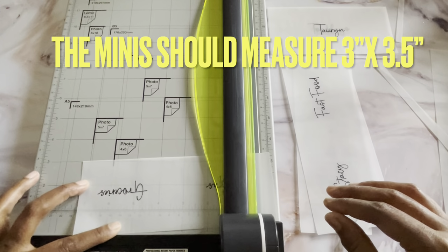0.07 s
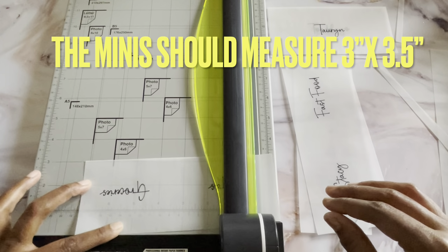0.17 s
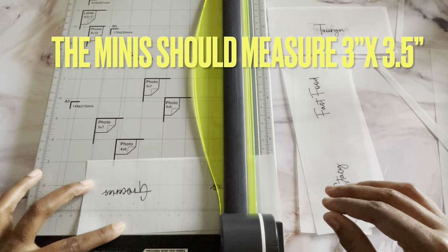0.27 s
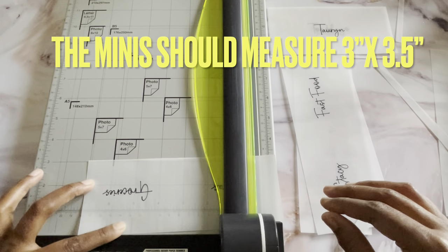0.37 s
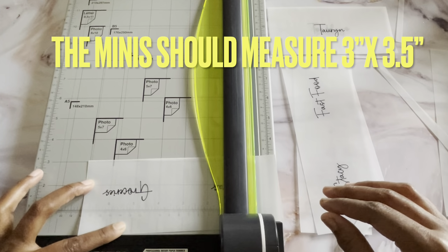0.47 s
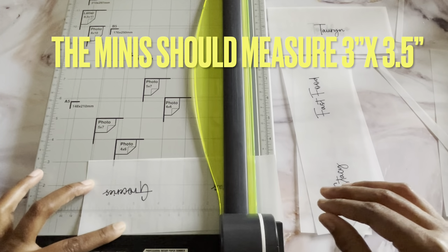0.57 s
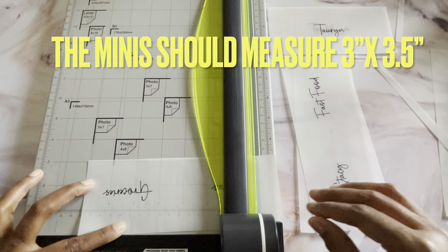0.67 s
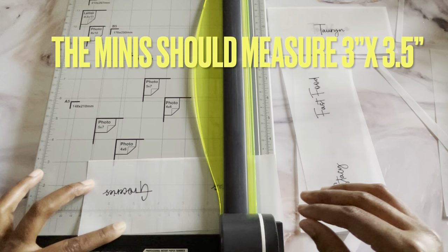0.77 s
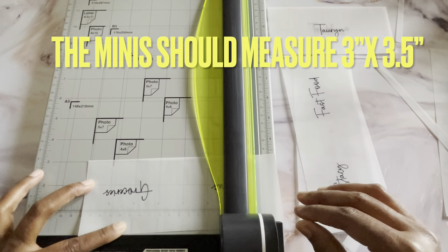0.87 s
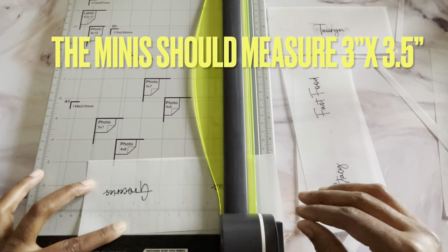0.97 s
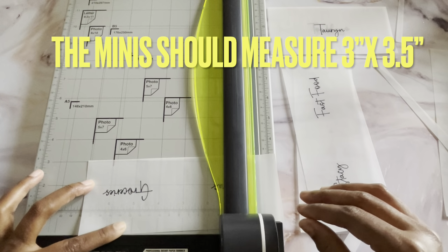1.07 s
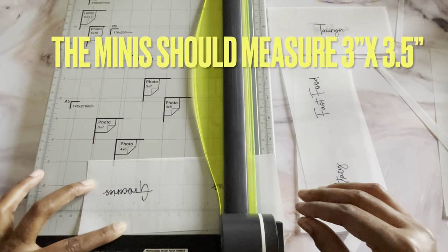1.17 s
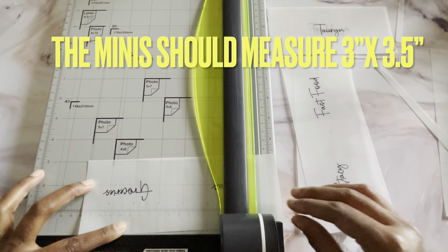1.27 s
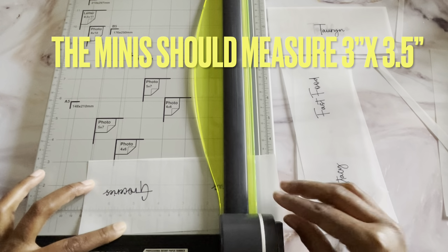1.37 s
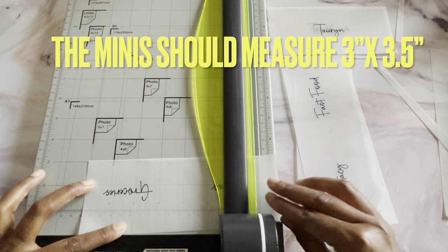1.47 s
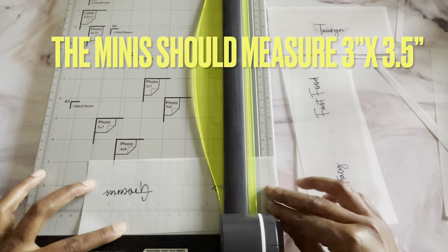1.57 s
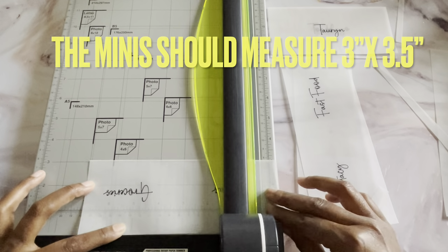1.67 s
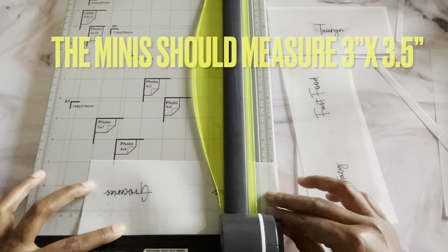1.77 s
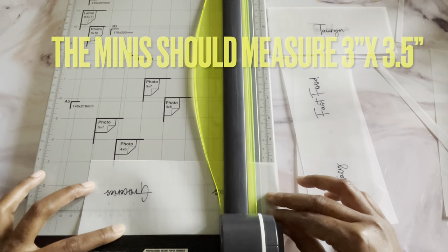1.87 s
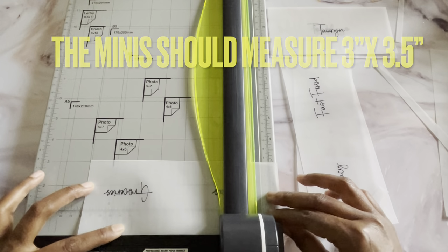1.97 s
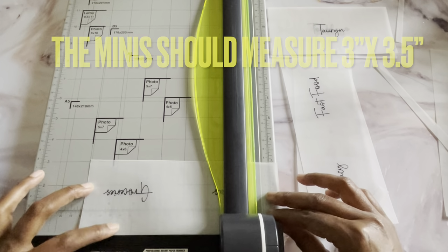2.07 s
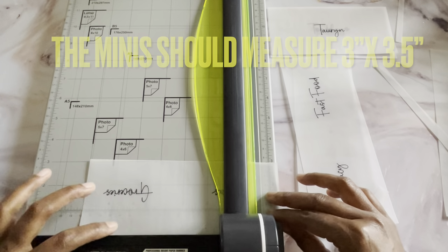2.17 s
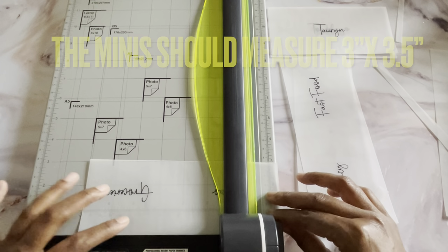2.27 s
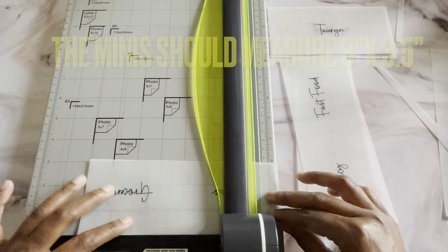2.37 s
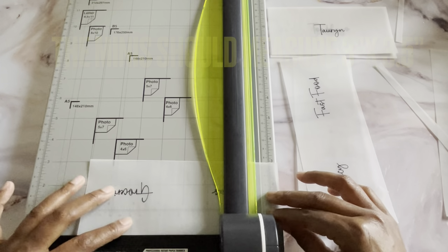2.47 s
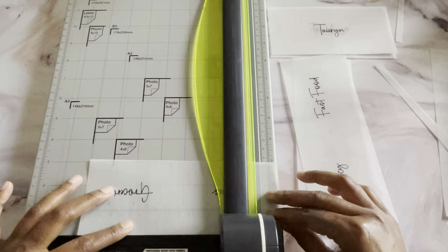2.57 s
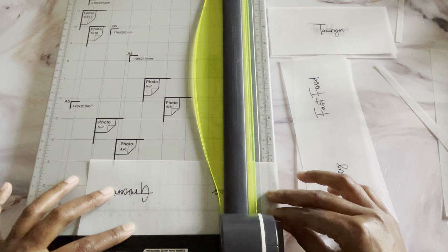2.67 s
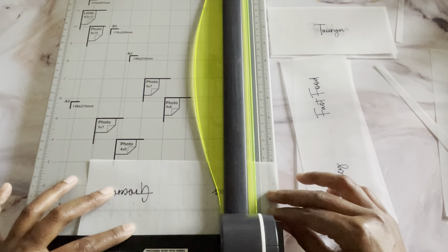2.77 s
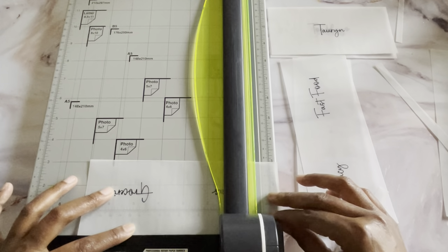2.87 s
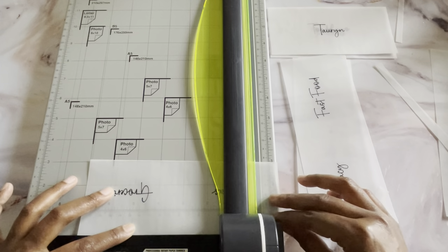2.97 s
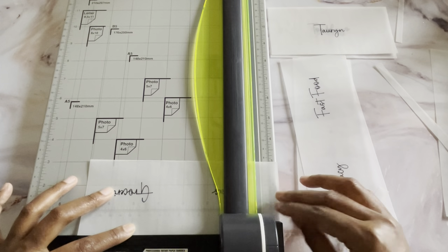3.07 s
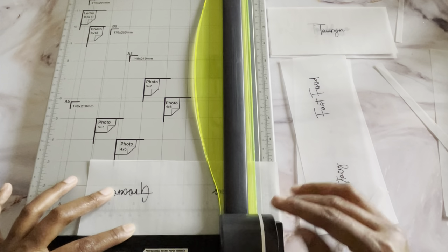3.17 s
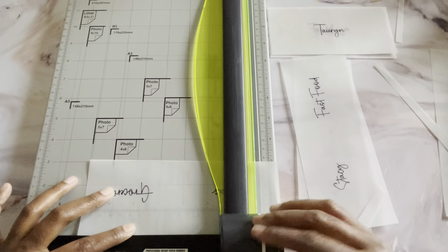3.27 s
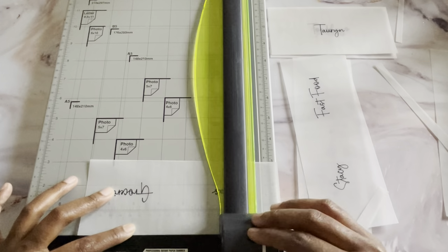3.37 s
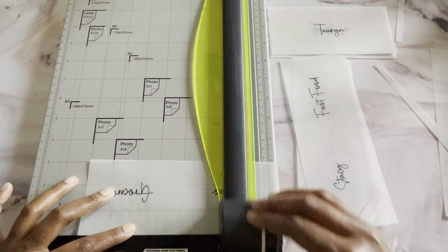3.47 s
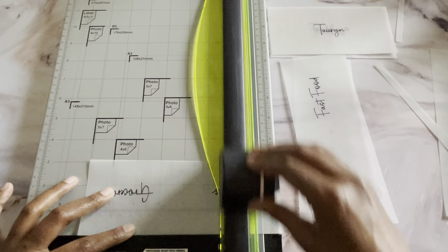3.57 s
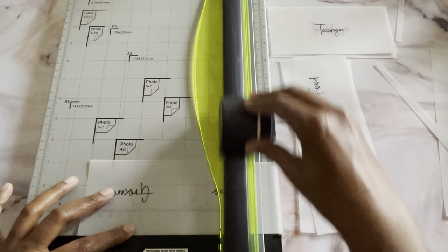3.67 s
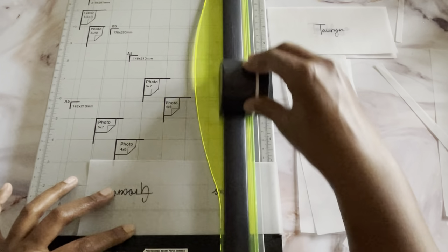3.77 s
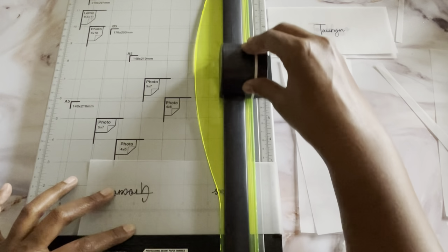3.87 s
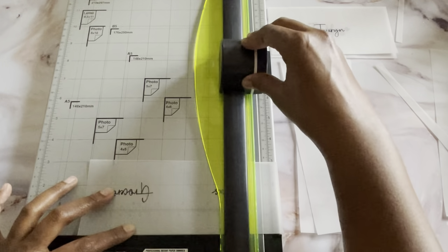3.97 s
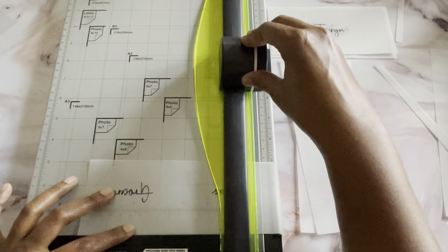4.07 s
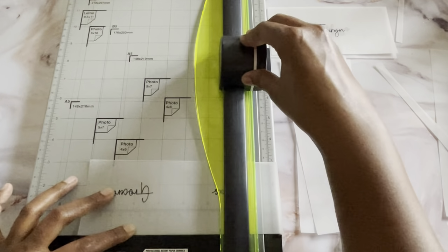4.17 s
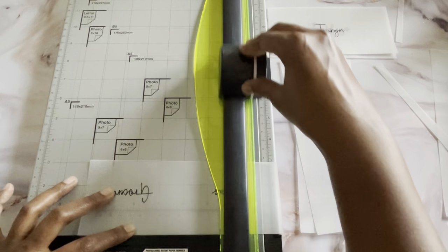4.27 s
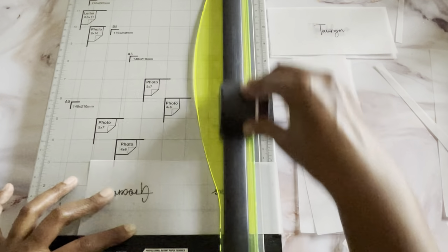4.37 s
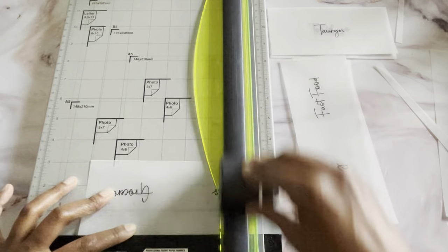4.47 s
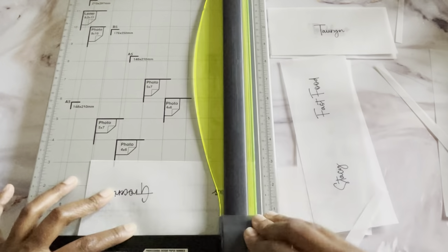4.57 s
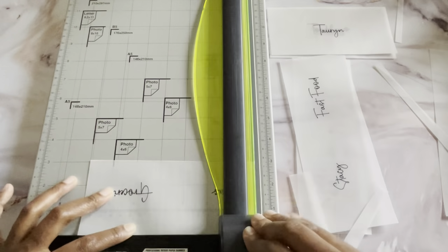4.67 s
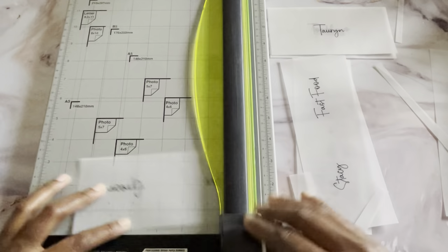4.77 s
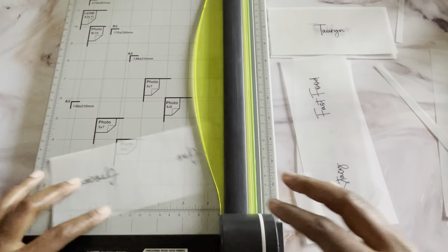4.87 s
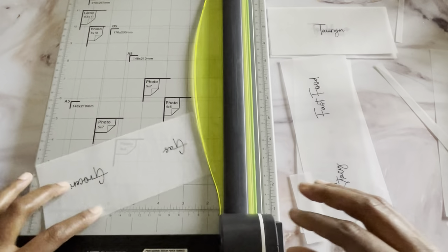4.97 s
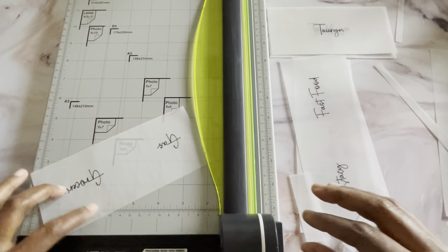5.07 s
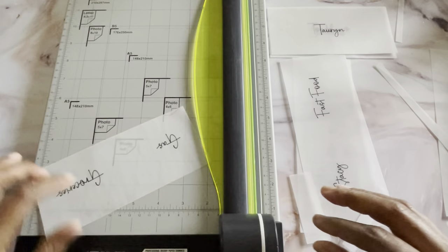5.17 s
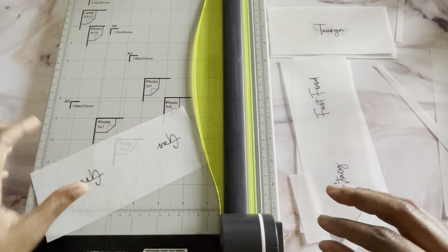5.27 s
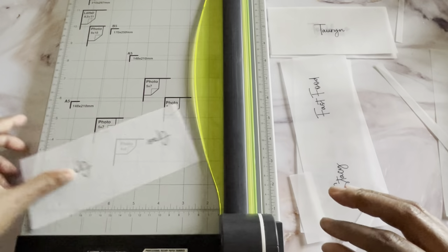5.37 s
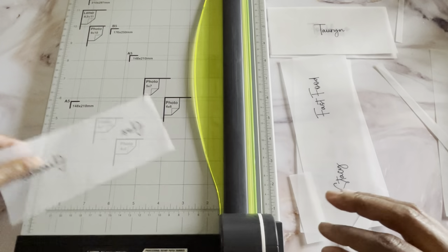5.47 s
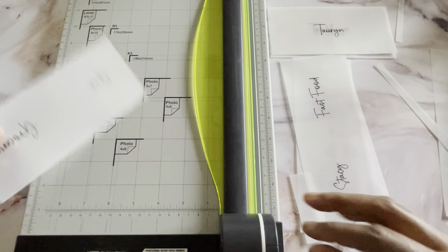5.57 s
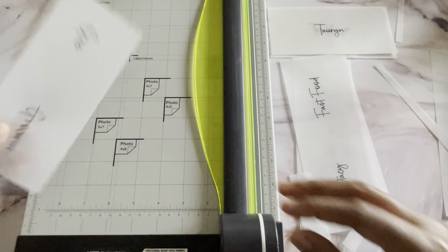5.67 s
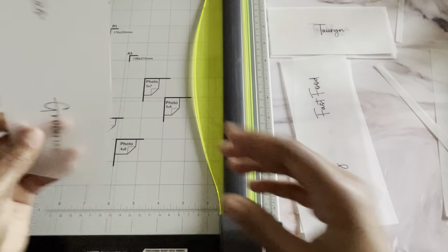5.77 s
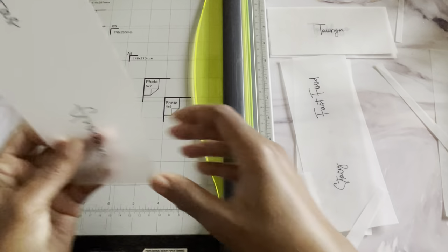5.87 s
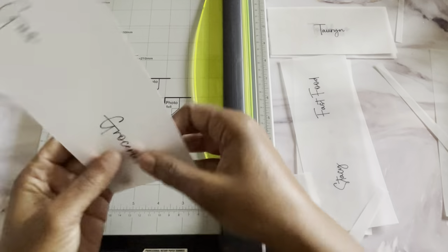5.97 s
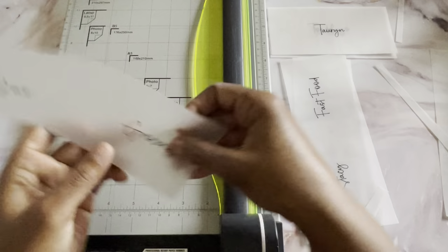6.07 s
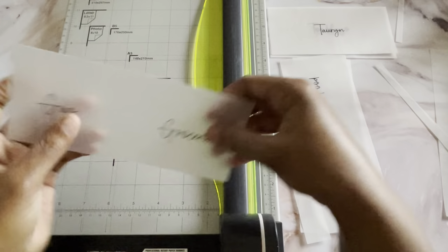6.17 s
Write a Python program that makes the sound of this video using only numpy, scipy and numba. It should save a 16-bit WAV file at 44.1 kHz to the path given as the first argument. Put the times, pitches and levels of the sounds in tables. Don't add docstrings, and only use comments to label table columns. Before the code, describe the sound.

Faint paper ticks and clamp creaks, two gritty trimmer strokes with hollow knocks, then a stiff sheet being lifted, crackling and flapping close by.

```python
import sys
import numpy as np
from scipy import signal
from scipy.fft import rfft, irfft, next_fast_len
from scipy.io import wavfile
from scipy.ndimage import uniform_filter1d
from numba import njit

SR = 44100
rng = np.random.default_rng(int(sys.argv[2]) if len(sys.argv) > 2 else 0)


def dump(signal):
    limited = np.clip(np.atleast_2d(signal).T, -1, 1)
    pcm = np.round(limited * 32767).astype(np.int16)
    wavfile.write(sys.argv[1], SR, pcm)


def natural_amplitude(level_db):
    exponent = np.asarray(level_db, float) / 20
    return 10 ** exponent


N = 274478
T = np.arange(N) / SR
PAD = next_fast_len(N + 8192)
FREQS = np.fft.rfftfreq(PAD, 1 / SR)

# (f/Hz, level/dB)
SCRAPE = [(300, -4), (600, 12.5), (1500, 9.5), (3000, 10), (4200, 3.5), (5500, -7.5), (8000, -31)]
# (f/Hz, level/dB)
TEAR = [(3200, -32), (4500, -7), (5800, 3), (7500, 2), (9000, -15)]
# (f/Hz, level/dB)
FIZZ = [(6000, -15.5), (8000, 6), (10500, -2.5), (13000, -8), (14300, -2), (15500, -12.5), (16500, -13),
        (17500, -48)]
# (f/Hz, level/dB)
FLAP = [(250, -2), (500, -3.5), (1000, -4), (2000, -10.5), (3000, -10), (4500, -29)]


def noise():
    return rng.standard_normal(N)


def unit(x):
    return x / np.sqrt(np.mean(x ** 2))


def colour(x, points, shape=1):
    hz, db = np.transpose(points)
    gain = natural_amplitude(np.interp(np.log(FREQS + 1), np.log(hz), db))
    return irfft(rfft(x, PAD) * gain * shape, PAD)[:N]


def ring(x, hz, width):
    return signal.lfilter(*signal.iirpeak(hz, hz / width, fs=SR), x)


def modes(x, table):
    out = np.zeros(len(x))
    for hz, db, t60 in table:
        pole = np.exp(2j * np.pi * hz / SR - np.log(1000) / (t60 * SR))
        out += natural_amplitude(db) * signal.lfilter([1], [1, -pole], x).imag
    return out


@njit
def sweep(x, hz, width):
    y, b, l = np.empty(len(x)), 0., 0.
    for i in range(len(x)):
        g = np.tan(np.pi * hz[i] / SR)
        v = (b + g * (x[i] - l)) / (1 + g * (g + width))
        b, l, y[i] = 2 * v - b, l + 2 * g * v, width * v
    return y


def walk(rate):
    k = int(SR / rate)
    held = np.repeat(rng.standard_normal(N // k + 1), k)
    return 1.2 * uniform_filter1d(held, k)[:N]


def grit(spread_db, flutter_db):
    grains = np.minimum(rng.exponential(size=N // 32 + 1), 3.6)
    grains = uniform_filter1d(np.repeat(grains, 32)[:N], size=24)
    return noise() * natural_amplitude(spread_db * grains + flutter_db * walk(40))


def play(spans):
    s, *columns = np.transpose(np.vstack(spans))
    on = sum((T >= rows[0][0]) & (T <= rows[-1][0]) for rows in spans)
    db, *rest = (np.interp(T, s, c) for c in columns)
    return natural_amplitude(db) * uniform_filter1d(1. * on, size=600), *rest


def burst(s, ms, rise=.15):
    i = int(s * SR)
    t = np.arange(min(N - i, 6000)) / SR / (max(ms, .5) / 1000)
    return slice(i, i + len(t)), (1 - np.exp(-t / rise)) * np.exp(-t)


def struck(table, rise):
    out = np.zeros(N)
    for s, db, hz, t60 in table:
        at, env = burst(s, 1000 * t60 / np.log(1000), rise)
        out[at] += natural_amplitude(db) * env * np.sin(2 * np.pi * hz * np.arange(len(env)) / SR)
    return out


def dying(table, rise_s):
    s, db, t60, extra_db = np.transpose(table)[:, :, None]
    t = np.maximum(T - s, 0)
    env = natural_amplitude(db - 60 * t / t60) * (1 - np.exp(-t / rise_s))
    return env.sum(axis=0), (env * natural_amplitude(extra_db)).sum(axis=0)


def cracks(table, ms, top_db, rub, width, broad, rise):
    out = np.zeros(N)
    treble = unit(colour(noise(), TEAR)) + natural_amplitude(top_db) * unit(colour(noise(), FIZZ))
    for s, db, hz, treble_db in table:
        at, env = burst(s, ms, rise)
        voice = unit(ring(rub[at], hz, width * hz)) + broad * rub[at]
        grind = burst(s, ms, 0.17)[1] ** 1.9
        out[at] += natural_amplitude(db - 8.5) * (env * voice + 7.24 * grind * natural_amplitude(treble_db) * treble[at])
    return out


def ventilation():
    # (f/Hz, level/dB)
    spectrum = [(15, -47.5), (25, -21.5), (35, -21.5), (49, -0.5), (123, -6.5), (166, -23.5), (195, -10.5),
                (217, -14.5), (301, -19.5), (326, -20), (384, -21), (416, -25.5), (560, -28), (887, -44),
                (6500, -59.5), (8000, -64.5), (12500, -63.5), (14000, -85)]
    # (f/Hz, width/Hz, level/dB)
    hum = [(60.3, 11, -57), (118, 5.9, -62.5), (148, 15, -63.5), (192.5, 5.37, -61.5), (244.3, 6.5, -74.5),
           (295.8, 5.4, -72), (382.5, 5.5, -79.5)]
    # (f/Hz, level/dB)
    side = [(150, -27.5), (380, -2), (700, 4.5), (2400, 2), (6000, -4)]
    tones = sum(natural_amplitude(db) * unit(ring(ring(noise(), hz, width), hz, width)) for hz, width, db in hum)
    air = natural_amplitude(-56) * unit(colour(noise(), spectrum)) * natural_amplitude(0.68 * walk(7.5))
    diffuse = colour(np.roll(air, N // 2), side)
    return air + tones + diffuse * np.array([[1], [-1]])


def drags():
    # (t/s, length/s, level/dB, whisper f/Hz, hiss above whisper/dB)
    slides = [(0.0, 0.012, -62, 4200, 2.5), (0.023, 0.036, -74, 4200, -3), (0.108, 0.079, -83.5, 5670, 4.5),
              (0.217, 0.072, -83, 5650, 2.5), (1.576, 0.16, -80.5, 5000, 16), (1.72, 0.044, -61, 4130, 0),
              (1.756, 0.036, -66.5, 4040, -13), (1.804, 0.091, -70, 3600, -9),
              (1.953, 0.057, -67.5, 4080, -10.5), (2.351, 0.0058, -42.5, 5700, -35),
              (2.532, 0.089, -81, 5500, 10), (2.838, 0.09, -74, 5600, -7), (2.934, 0.049, -75, 5630, -14),
              (2.981, 0.043, -70, 5600, -9), (3.329, 0.027, -56, 5000, -2),
              (4.216, 0.034, -59.5, 5140, 4.5), (4.738, 0.16, -60.5, 5500, 14.5),
              (4.994, 0.072, -91.5, 5030, 21), (5.669, 0.024, -51, 5300, 3.5), (6.133, .03, -74, 4500, -8)]
    fade_db, rise_s, release_s = -7.5, 0.009, 0.0051
    s, length, db, hz, hiss_db = np.transpose(slides)[:, :, None]
    t = np.maximum(T - s, 0)
    env = natural_amplitude(db + fade_db * t / length) * (1 - np.exp(-t / rise_s))
    env = env * np.exp(-np.maximum(t - length, 0) / release_s)
    hz = np.interp(T, (s + length / 2)[:, 0], hz[:, 0])
    rub = grit(2.2, 1.0)
    whisper = unit(sweep(sweep(rub, hz, 0.4), hz, 0.59))
    whisper = unit(whisper + 0.29 * unit(colour(rub, SCRAPE)))
    return env.sum(axis=0) * whisper + (env * natural_amplitude(hiss_db)).sum(axis=0) * unit(colour(rub, FIZZ))


def creaks():
    # (t/s, level/dB, length/ms, upper modes/dB)
    slips = [
        (1.421, -70.5, 31, 5),
        (1.473, -57, 27, 4),
        (1.497, -58, 22, 3),
        (1.54, -78, 8.6, 19),
        (1.585, -78, 20, -7),
        (3.29, -75, 35, 17.5),
    ]
    # (f/Hz, width/Hz, level/dB)
    clamp = [(1370, 76, 5), (1990, 78, -11.5), (2660, 45, -7), (3150, 380, -18)]
    # (t/s, level/dB, f/Hz, t60/s)
    ticks = [(.039, -52, 2100, 0.014), (.038, -52, 4200, 0.016), (.038, -56, 3700, 0.017),
             (.038, -57.5, 5840, 0.012), (.143, -70, 1400, .02), (.143, -71, 1740, 0.03),
             (.355, -76, 5200, .015), (.463, -75, 5200, .015), (1.422, -65, 2660, 0.036),
             (1.424, -63, 1324, 0.028), (1.476, -63, 3150, .06), (1.515, -70, 2670, .08),
             (1.729, -63, 4300, .03), (1.744, -64, 5000, .03), (1.779, -61, 3920, .04),
             (2.066, -60, 1260, 0.023), (2.092, -70, 1180, 0.046), (4.192, -51.5, 1030, 0.017),
             (4.965, -46, 1740, 0.031)]
    low, high = np.zeros((2, N))
    for s, db, ms, upper_db in slips:
        at, env = burst(s, ms, 0.076)
        low[at] += natural_amplitude(db) * env
        high[at] += natural_amplitude(db + upper_db) * env
    rub = grit(1.5, 1.2)
    first, *upper = (natural_amplitude(db) * ring(ring(rub, hz, width), hz, 3 * width) for hz, width, db in clamp)
    return (low * first + high * sum(upper)) / np.std(first) + struck(ticks, 0.2)


def snaps():
    # (t/s, peak/dB, f/Hz, treble above it/dB)
    nudges = [(0.3194, -76, 950, -11), (0.3594, -75, 961, -4.5), (1.4237, -51, 2800, -26),
              (1.5274, -60.5, 5500, -1.5), (1.5505, -56, 4400, -5), (1.5905, -66, 1370, 0),
              (1.6703, -71, 929, -1), (1.7145, -62, 4860, 7), (1.7844, -63, 3990, -8),
              (2.066, -58, 1180, -21), (2.3516, -54.5, 5740, -7.5), (2.379, -63, 904, -7),
              (2.8498, -57.5, 902, -20), (3.0294, -66, 953, -10)]
    # (t/s, peak/dB, f/Hz, treble above it/dB)
    folds = [(5.3148, -71, 5740, 5), (5.3575, -45.5, 1325, -8), (5.447, -47, 1500, -14),
             (5.458, -44, 900, -18), (5.5727, -38, 1560, -24), (5.5798, -30, 940, -33),
             (5.583, -48, 2300, -27), (5.5987, -52, 890, -2), (5.7425, -35, 876, -24),
             (5.8605, -42, 3700, -4.5), (5.9168, -33.5, 1080, -11), (5.9215, -22.5, 2270, -29),
             (5.9407, -33.5, 1130, -30), (5.9897, -29.5, 2370, -24), (6.0031, -24, 1990, -20),
             (6.0096, -30.5, 2330, -33), (6.0175, -32, 1050, -36), (6.0406, -38, 2000, -34),
             (6.0786, -54, 1080, 6.5), (6.148, -32, 910, -21), (6.155, -26, 1060, -24),
             (6.1596, -22, 1060, -39), (6.172, -47, 900, -25)]
    rub = unit(colour(grit(2.2, 0), FLAP))
    nudged = cracks(nudges, ms=3.9, top_db=-1, rub=rub, width=.6, broad=.8, rise=0.21)
    return nudged + cracks(folds, ms=5.6, top_db=-1.5, rub=rub, width=.6, broad=.8, rise=0.21)


def knocks():
    # (t/s, peak/dB, f/Hz, treble above it/dB)
    hits = [(3.336, -37, 1510, -20), (3.341, -32, 765, -28), (3.346, -28, 1620, -29),
            (3.353, -28, 3060, -16.5), (3.571, -36.5, 5500, -2), (3.602, -43, 2510, -7),
            (3.846, -30.5, 3300, -10.5), (3.85, -35.5, 2600, -12), (3.86, -29, 716, -26),
            (4.098, -44, 620, -32), (4.234, -32.5, 1280, -15.5), (4.351, -38, 1100, -3),
            (4.437, -29, 1330, -7.5), (4.535, -25, 2460, -23.5), (4.55, -21, 1220, -6.5),
            (4.567, -25, 1150, -16), (4.578, -33, 1670, -28), (4.617, -49, 1090, -8),
            (4.63, -42.5, 1087, -7.5), (4.697, -33, 2010, -14.5), (4.702, -29.5, 1488, -20.5),
            (4.7115, -23, 1150, -7.5), (4.77, -18, 2680, -20.5), (4.771, -29.5, 956, -21.5),
            (4.812, -27.5, 680, -15.5), (4.823, -32.5, 710, -19.5), (4.878, -40, 2500, -25),
            (4.912, -39.5, 1200, -32)]
    # (f/Hz, level/dB)
    body = [(250, 1.5), (600, 5), (1200, -3.5), (2500, -10.5), (3800, -7), (5000, -10.5), (7000, -33)]
    # (t/s, peak/dB, f/Hz, t60/s)
    thumps = [(3.347, -30, 214, 0.099), (3.357, -29.5, 363, 0.059), (3.366, -32, 153, 0.19),
              (3.391, -39.5, 150.2, 0.39), (3.858, -36, 480, 0.097), (3.875, -33, 320, 0.059),
              (4.239, -25.5, 383, 0.032), (4.259, -37.5, 144, 0.38), (4.551, -25.5, 517, 0.054),
              (4.554, -23, 366.4, 0.12), (4.574, -28.5, 148, 0.26), (4.598, -59.5, 153, 0.15),
              (4.711, -27.5, 459, 0.051), (4.774, -27, 390, 0.078), (4.814, -36.5, 355, 0.11),
              (4.838, -39, 160.5, 0.14), (4.884, -44.5, 359, 0.28), (4.913, -35.5, 363, 0.14),
              (5.918, -42.5, 110, 0.11), (6.153, -33, 118, 0.063)]
    rub = unit(colour(noise(), body))
    crack = cracks(hits, ms=4.9, top_db=-4.5, rub=rub, width=.4, broad=.9, rise=0.15)
    return crack + struck(thumps, 0.059)


def carriage():
    # (t/s, scrape level/dB, blade bite/dB)
    strokes = [
        [(3.37, -78, -12), (3.456, -60, -9.5), (3.582, -51, -5), (3.69, -53.5, -11), (3.746, -52, -7.5),
         (3.834, -61.5, -8), (3.86, -55, -22)],
        [(4.245, -68, -11), (4.27, -67, -1), (4.362, -53.5, -1.5), (4.433, -47.5, -12), (4.444, -47, 1),
         (4.474, -47.5, 8), (4.526, -55, 4.5), (4.56, -46.5, -24.5), (4.6, -64.5, -5.5)],
    ]
    # (f/Hz, width/Hz, level/dB)
    board_modes = [
        [(1080, 130, 5.5), (1300, 110, 1), (1700, 65, -8), (2600, 250, -4.5), (3150, 220, 2), (3300, 200, -6.5),
         (4200, 230, -0.5), (5500, 100, -3.5)],
        [(1130, 140, 17.5), (1225, 110, 14.5), (1904, 83, -9.5), (2490, 80, -8), (2830, 90, 7.5),
         (3600, 180, -17.5), (5300, 120, -4), (5930, 150, -9.5)],
    ]
    # (f/Hz, level/dB, t60/s)
    base = [(118, -33.5, 0.11), (150.2, -7, 0.37), (222.3, 5, 0.04), (330.4, -1, 0.028), (364.3, -2, 0.047),
            (444, -4, 0.035)]
    stroke_drum_db = [-6, 8.5]
    # (t/s, level/dB, t60/s, drumming above it/dB)
    shudders = [(3.34, -50.5, 0.09, 16.5), (3.352, -38, 0.035, 4), (3.386, -68.5, 0.35, 24),
                (3.846, -46.5, 0.16, -1), (3.87, -64.5, 0.53, 12.5), (4.095, -76, 0.75, 18),
                (4.237, -55, 0.16, 14.5), (4.434, -45, 0.69, -16), (4.551, -32.5, 0.079, -19),
                (4.585, -61, 0.63, 18), (4.712, -22, 0.017, -9), (4.725, -58, 0.56, 20),
                (4.769, -35, 0.056, -6.5), (4.785, -46, 0.49, 9.5), (4.95, -92, 0.36, 17)]
    patchy_db, board_share, shudder_share = 3.5, .7, .25
    gain, bite_db = play(strokes)
    going_up = T < strokes[1][0][0]
    drum_db = np.where(going_up, *stroke_drum_db)
    shake, shake_drum = dying(shudders, rise_s=0.0019)
    rub = grit(1.6, 1.5)
    passes = []
    for table in board_modes:
        passes.append(unit(sum(
            natural_amplitude(db + patchy_db * walk(22)) * sweep(rub, hz * (1 + 0.015 * walk(9)), width / hz)
            for hz, width, db in table)))
    board = np.where(going_up, passes[0], 2.27 * passes[1])
    broad = unit(colour(rub, SCRAPE))
    scrape, shudder = unit(broad + board_share * board), unit(broad + shudder_share * board)
    drum = (gain * natural_amplitude(drum_db) + shake_drum) * unit(modes(rub, base))
    tear = (gain * natural_amplitude(bite_db) + shake * natural_amplitude(-27.5)) * unit(colour(rub, TEAR))
    fizz = (gain * natural_amplitude(bite_db + 2) + shake * natural_amplitude(-16)) * unit(colour(rub, FIZZ))
    return gain * scrape + shake * shudder + drum + tear + fizz


def pings(buzz):
    # (t/s, peak/dB, f/Hz, t60/s)
    plastic = [(3.846, -37, 1686, 0.03), (3.846, -36, 3170, 0.026), (3.847, -40, 2450, .03),
               (3.849, -34, 4000, 0.023), (4.098, -51, 1160, 0.033), (4.098, -55.5, 1760, 0.026),
               (4.098, -61, 2560, 0.04), (4.235, -46, 2720, 0.036), (4.241, -51, 1200, 0.039),
               (4.332, -50, 2970, .04), (4.35, -41.5, 2930, 0.037), (4.351, -49.5, 5560, .03),
               (4.416, -56, 2880, .04), (4.436, -36, 2760, 0.055), (4.451, -35.5, 2730, 0.036),
               (4.47, -56, 1880, 0.035), (4.474, -36.5, 2410, 0.085), (4.5355, -37, 2200, .01),
               (4.538, -30, 2320, 0.015), (4.5505, -27, 2700, 0.016), (4.552, -28, 3350, 0.023),
               (4.553, -29, 4100, 0.02), (4.568, -32, 3250, 0.041), (4.569, -42.5, 4160, .03),
               (4.7122, -30.5, 4100, 0.016), (4.7125, -37, 2650, .04), (4.7695, -35.5, 2950, .02),
               (4.7695, -40.5, 3670, .02), (4.776, -32, 1770, 0.034), (4.777, -32.5, 3020, 0.036),
               (4.811, -37, 1660, 0.052), (4.813, -36.5, 2700, 0.045), (4.815, -41, 4000, 0.035),
               (4.819, -34.5, 3160, 0.04), (4.846, -62, 3000, .04), (4.878, -42, 2660, .04),
               (4.911, -46, 2450, 0.035)]
    return buzz * struck(plastic, 0.061)


def bends():
    # (t/s, peak/dB, first f/Hz, last f/Hz, t60/s)
    waves = [
        (4.5505, -25, 1504, 460, 0.042),
        (4.7118, -20.5, 1680, 484, 0.037),
        (4.77, -32, 1316, 382, 0.098),
        (4.912, -40.5, 1186, 450, 0.078),
    ]
    fall_s = 0.00392
    out = np.zeros(N)
    for s, db, first_hz, last_hz, t60 in waves:
        at, env = burst(s, 1000 * t60 / np.log(1000), 0.042)
        hz = last_hz + (first_hz - last_hz) * np.exp(-np.arange(len(env)) / SR / fall_s)
        out[at] += natural_amplitude(db) * env * np.sin(2 * np.pi * np.cumsum(hz) / SR)
    return out


def rail():
    # (t/s, level/dB)
    taps = [
        (4.712, -70),
        (4.77, -65.5),
        (4.912, -72),
    ]
    # (f/Hz, level/dB, t60/s)
    steel = [(2309, -1, 1.3), (1610, -4, .8), (2799, -5, .6), (3262, -7, 1.5), (3321, 4.5, .6),
             (4037, -4, 1.4), (4050, -16, 1.1)]
    tap = np.zeros(N)
    for s, db in taps:
        tap[int(s * SR)] = natural_amplitude(db)
    return modes(tap, steel) * natural_amplitude(.5 * walk(40))


def lift():
    # (t/s, brushing level/dB, hiss above it/dB, whisper f/Hz)
    brushing = [
        [(5.308, -76, 3, 5700), (5.324, -62, 13, 5730), (5.39, -59.5, 9, 5200), (5.44, -61.5, 11.5, 5400),
         (5.462, -50, -2, 5400), (5.5, -52, 3.5, 5500), (5.53, -55, 1, 5600), (5.565, -54.5, 0, 4670),
         (5.641, -69, 6.5, 5600), (5.69, -62.5, -4, 5260), (5.73, -66, -5, 5400), (5.78, -58.5, -8, 4200),
         (5.84, -58.5, 0.5, 5440), (5.885, -58.5, -3, 5300), (5.907, -63, -7, 5000), (6.09, -64.5, -9, 3300),
         (6.14, -61, -3, 5500), (6.22, -54, 5.5, 5600)],
    ]
    # (t/s, level/dB, t60/s, flapping above it/dB)
    flutters = [
        (5.58, -75, 1, 11),
        (5.919, -46.5, 0.11, 8.5),
        (5.96, -52.5, 0.2, 2),
        (5.998, -46, 0.056, 5),
        (6.03, -83.5, 1, 28.5),
        (6.155, -55, 0.12, 9.5),
    ]
    # (f/Hz, level/dB)
    paper = [(2200, -7), (3200, 4), (4500, 2.5), (5500, 4), (7500, 6), (9000, -41.5)]
    gain, hiss_db, hz = play(brushing)
    flutter, flutter_flap = dying(flutters, rise_s=0.00068)
    rub = grit(1.5, 2.6)
    flap = unit(colour(grit(1.8, 2.4), FLAP))
    hiss = (gain * natural_amplitude(hiss_db) + flutter * natural_amplitude(-6)) * unit(colour(rub, FIZZ))
    rustle = colour(rub, paper)
    whisper = unit(sweep(rustle, hz * natural_amplitude(0.44 * walk(25)), 0.46))
    rustle = unit(unit(rustle) + 0.86 * whisper * natural_amplitude(1.7 * walk(15)))
    return (gain + flutter) * rustle + (gain * natural_amplitude(-4.5) + flutter_flap) * flap + hiss


def pops(buzz):
    # (t/s, peak/dB, f/Hz, t60/s)
    panels = [(5.309, -60, 1335, 0.044), (5.333, -53, 1240, 0.052), (5.356, -45, 800, 0.024),
              (5.356, -51, 1284, 0.072), (5.457, -49, 1030, 0.022), (5.476, -45, 1600, 0.025),
              (5.476, -58, 3680, .03), (5.485, -46, 2540, .03), (5.492, -52, 1730, .03),
              (5.508, -48, 2497, .03), (5.555, -48, 5100, .03), (5.568, -47, 4220, .03),
              (5.58, -39.5, 2330, 0.047), (5.581, -34, 1008, 0.043), (5.595, -45, 1690, 0.028),
              (5.599, -43, 880, 0.036), (5.693, -51, 2170, .03), (5.712, -48, 900, .03),
              (5.742, -46, 1700, 0.027), (5.742, -45.5, 3700, 0.018), (5.861, -47, 2220, 0.033),
              (5.861, -44, 3640, 0.033), (5.861, -55, 4400, .02), (5.919, -29.5, 1983, 0.027),
              (5.92, -39, 760, 0.034), (5.922, -42, 4960, .02), (5.922, -32.5, 4190, 0.022),
              (5.923, -30.5, 3710, 0.019), (5.924, -33.5, 2650, 0.034), (5.99, -30, 2780, .02),
              (5.998, -50, 5870, 0.033), (6.004, -35, 3950, .03), (6.009, -31, 2260, 0.026),
              (6.017, -39, 2710, 0.025), (6.036, -39, 1960, .025), (6.112, -52, 890, 0.027),
              (6.126, -42, 880, 0.02), (6.127, -42, 1650, 0.033), (6.16, -34.5, 869, 0.048),
              (6.162, -34.5, 3060, .02)]
    return buzz * struck(panels, 0.12)


def room_tail():
    t60_s = .3
    t = np.arange(SR // 2) / SR
    tail = rng.standard_normal(len(t)) * np.exp(-np.log(1000) * t / t60_s) * (t > .004)
    return signal.lfilter([.45], [1, -.55], tail / np.sqrt(np.sum(tail ** 2)))


def lean(x, table):
    return np.array([colour(x, np.array(table) * [1, side]) for side in (-1, 1)])


def scene():
    # (f/Hz, right port gain/dB)
    paper_lean = [(150, 1.5), (700, 1.5), (1200, 1.5), (2400, 1.3), (5000, 1)]
    # (f/Hz, right port gain/dB)
    desk_lean = [(150, -1.6), (350, 0.5), (700, -0.5), (1400, 1), (2800, 0.5), (6000, 1.08)]
    buzz = unit(1 + .6 * walk(500))
    paper = lift() + snaps() + pops(buzz)
    trimmer = carriage() + knocks() + bends() + rail() + pings(buzz)
    desk = lean(paper, paper_lean) + lean(trimmer, desk_lean) + creaks() + drags()
    echo = natural_amplitude(-8.5) * signal.fftconvolve(desk.mean(axis=0), room_tail())[:N]
    return desk + echo + ventilation()


def low_pass(x):
    return signal.sosfilt(signal.butter(12, 17150, fs=SR, output="sos"), x)


def record(dry):
    # (f/Hz, phase/rad)
    port_lead = [(0, 0), (2200, .2), (3500, .8), (5200, 0), (7000, 2.95), (8200, 3.35), (10400, 6),
                 (11600, 6.4), (13700, 9.2), (14900, 9.6), (15500, 10.9), (17000, 11)]
    # (f/Hz, level/dB)
    spread = [(60, -28), (200, -20.5), (400, -15.5), (700, -5), (1400, -10), (2400, -8.5), (4400, -6),
              (7000, -22.5), (10000, -14.5), (15000, -17.5)]
    top_hz, bass_cut_hz = 16050, 41
    lead = np.exp(.5j * np.interp(FREQS, *np.transpose(port_lead)))
    near = rfft(rng.standard_normal(6000) * np.exp(-np.arange(6000) / 1100), PAD)
    near -= uniform_filter1d(near.real, size=PAD // 700)
    near /= np.sqrt(uniform_filter1d(np.abs(near) ** 2, size=PAD // 400))
    other = colour(dry.mean(axis=0), spread, near)
    flat = [(20, 0), (top_hz, 0), (top_hz + 150, -22), (20000, -60)]
    left = colour(dry[0] + other, flat, lead)
    right = colour(dry[1] - other, flat, lead.conj())
    bass_cut = signal.butter(2, bass_cut_hz, "high", fs=SR, output="sos")
    return low_pass(signal.sosfilt(bass_cut, np.array([left, right])))


dry = scene()
out = record(dry)
dump(out)
```